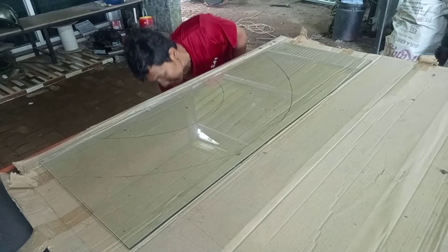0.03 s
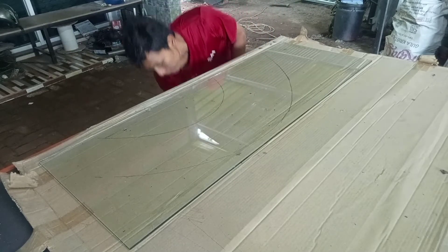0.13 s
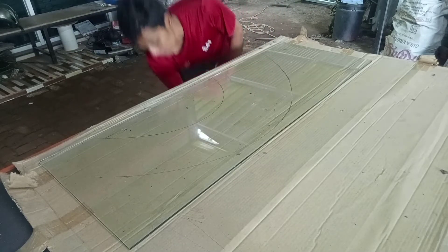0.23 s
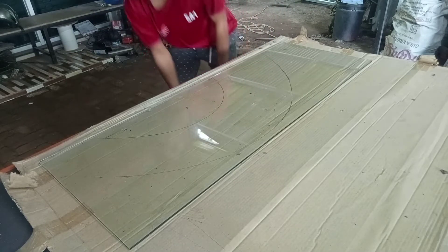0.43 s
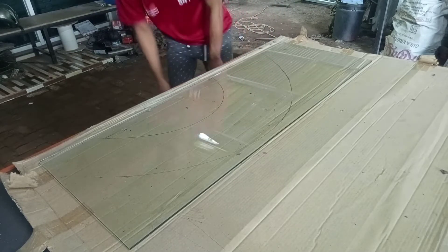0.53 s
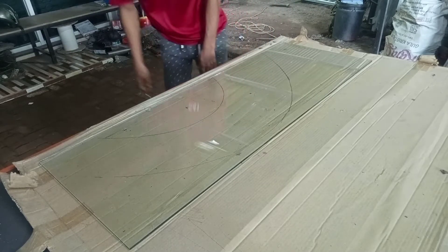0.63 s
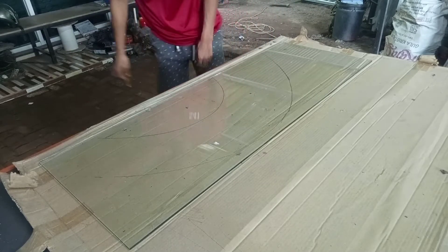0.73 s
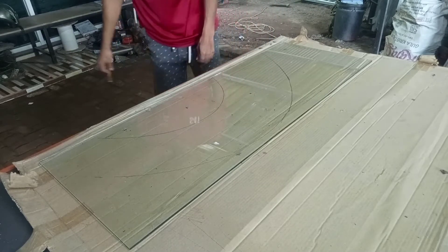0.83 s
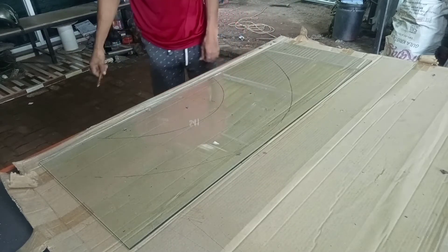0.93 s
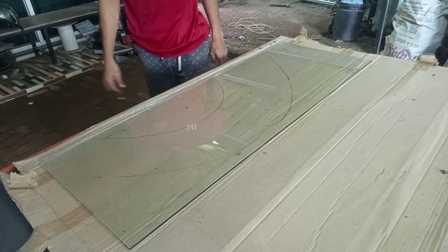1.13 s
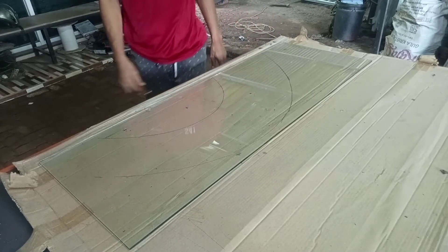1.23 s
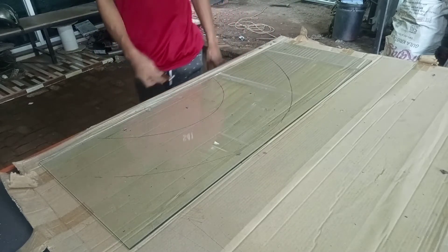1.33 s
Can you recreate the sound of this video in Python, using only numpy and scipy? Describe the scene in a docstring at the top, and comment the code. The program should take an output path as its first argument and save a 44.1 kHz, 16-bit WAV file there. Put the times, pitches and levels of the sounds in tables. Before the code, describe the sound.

One sharp knock rings on a glass sheet, then shoes and clothes shuffle quietly.

```python
"""In a workshop, where a glass sheet lies on a table, a sharp knock rings out: the contact cracks,
the struck object rings in its normal modes, and the room answers with dense reverberation.
The ring of an earlier clink is still fading at the start. Soles and clothes shuffle by friction
as someone stands up. A distant engine hums and picks up speed, its harmonics rising together,
over soft low bumps, a machine's hum and a steady rumble and hiss."""
import sys
import numpy as np
from scipy import signal
from scipy.fft import rfft, irfft, next_fast_len
from scipy.io import wavfile
from scipy.ndimage import map_coordinates

SR = 44100
rng = np.random.default_rng(int(sys.argv[2]) if len(sys.argv) > 2 else 0)


def file_out(sig):
    """Save sig as 16-bit WAV at sys.argv[1]."""
    # one column per channel
    cols = np.atleast_2d(sig).T
    # limit, then scale
    lim = np.clip(cols, -1, 1)
    pcm = np.round(lim * 32767).astype(np.int16)
    wavfile.write(sys.argv[1], SR, pcm)


N = 61739
KNOCK_S = .1324


def amp(db):
    """Amplitude ratio of a level in decibels."""
    return 10 ** (np.asarray(db) / 20)


def unit(x):
    """Normalisation to rms 1."""
    return x / np.sqrt(np.mean(np.abs(x) ** 2) + 1e-20)


def clock():
    """Sample times in seconds."""
    return np.arange(N) / SR


def along(points, hz):
    """Interpolation of (f/Hz, value) points on a logarithmic frequency axis."""
    f, values = np.transpose(points)
    return np.interp(np.log(hz + 1), np.log(f + 1), values)


def wobble(rate):
    """Smooth random modulation: a spline through `rate` Gaussian knots a second."""
    return map_coordinates(rng.standard_normal(4096), [clock() * rate + 2], mode="wrap")


def filtered(x, response):
    """Linear filtering: the spectrum of x times a frequency response."""
    size = next_fast_len(N + 8192)
    return irfft(rfft(x, size) * response(np.fft.rfftfreq(size, 1 / SR)), size)[..., :N]


def noise(spectrum):
    """White noise filtered to a spectral shape, at rms 1."""
    return unit(filtered(rng.standard_normal(N), lambda hz: amp(along(spectrum, hz))))


def narrowband(hz, width_hz):
    """Random modulation broadens a spectral line into a band of rms 1."""
    modulation = wobble(width_hz) + 1j * wobble(width_hz)
    return unit(np.real(modulation * np.exp(2j * np.pi * hz * clock())))


def decay_time(age, hold_s=.15, hold_slope=.64):
    """Two-slope decay: the time counted towards T60 runs slowly at first, then at full rate."""
    return age - (1 - hold_slope) * np.minimum(age, hold_s)


def background():
    """Stationary broadband rumble and hiss, with the line spectrum of a humming machine."""
    # Hum partials: f/Hz, level/dB
    partials = [(152, -60), (229, -65)]
    # Rumble and hiss: f/Hz, relative spectral level/dB
    air = [(15, -49), (25, -25), (45, -4.5), (140, -7), (252, -15), (388, -13.5), (420, -14.5), (481, -13),
           (646, -20.5), (1110, -22), (1260, -24.5), (1530, -18.5), (1700, -27), (3330, -23), (5550, -49),
           (7660, -22.5), (8300, -36), (11800, -50.5), (15400, -42)]
    hum = sum(amp(db + .97 * wobble(5.2)) * np.sin(2 * np.pi * hz * clock()) for hz, db in partials)
    return amp(-50) * noise(air) + np.sqrt(2) * hum


def bumps(width_s=.023):
    """Dull bumps: Gaussian pulses modulate the amplitude of low-frequency noise."""
    # Pulse peaks: t/s, level/dB
    peaks = [(.07, -50.5), (.545, -46), (.83, -48), (1.095, -50), (1.205, -46)]
    # Bump spectrum: f/Hz, relative spectral level/dB
    spectrum = [(50, -23), (90, -4.5), (150, 1), (210, -5), (320, -20), (1000, -62)]
    return noise(spectrum) * sum(amp(db) * np.exp(-((clock() - s) / width_s) ** 2) for s, db in peaks)


def engine():
    """A periodic source radiates harmonics of its cycle rate; they rise as the engine speeds up."""
    # Cycle rate: t/s, f/Hz
    cycle_rate = [(0, 24.4), (.3, 24.37), (.7, 24.55), (.9, 25.93), (1.03, 28.3), (1.15, 31.74),
                  (1.4, 32.3)]
    # Envelope common to all orders: t/s, level/dB
    envelope = [(0, -44), (.1, -43), (.15, -50.5), (.45, -50), (.68, -48), (.78, -42), (.9, -43),
                (1.05, -47), (1.25, -50), (1.4, -57.5)]
    # Engine orders: multiple of the cycle rate, relative level/dB
    orders = [(2, -3), (3, -7.5), (4, -16), (5, -14.5), (6, -16), (8, -18)]
    t = clock()
    phase = 2 * np.pi * np.cumsum(np.interp(t, *np.transpose(cycle_rate))) / SR
    tone = sum(amp(db + 3.1 * wobble(14.68)) * np.sin(k * phase + rng.uniform(0, 2 * np.pi))
               for k, db in orders)
    return np.sqrt(2) * amp(np.interp(t, *np.transpose(envelope))) * tone


def shuffles(grit_db=1.6, scrape_s=1.258, scrape_rise_s=.01):
    """Friction of soles and clothes: noise swells that add in power, ending in a faintly singing scrape."""
    # Swells: peak t/s, rise/s, fall/s, scuff level/dB, thud level/dB, swish level/dB
    swells = [(.56, 0.077, 0.057, -52.5, -58, -70), (0.661, 0.048, 0.031, -47, -54, -66),
              (0.733, 0.034, 0.069, -48, -43.5, -59), (.925, 0.022, 0.043, -57, -62, -67),
              (1.2, 0.12, 0.11, -63.5, -51.5, -82), (1.345, .07, 0.24, -46.5, -50.5, -53.5)]
    # Midrange scuff, dull thud and treble swish: f/Hz, relative spectral level/dB
    scuff_spectrum = [(300, -5), (700, -4), (1060, -1), (1400, -5), (1900, 1), (2450, 1), (3000, -2.5),
                      (3900, -7), (4900, -24), (6200, -20), (7300, -9.5), (8500, -24), (12000, -28),
                      (15000, -24)]
    thud_spectrum = [(60, -13), (160, -3), (290, -10.5), (385, -1), (480, 2), (620, -11), (1000, -8.5),
                     (2000, -28.5), (6000, -58)]
    swish_spectrum = [(1000, -28), (3900, 1), (5200, -7.5), (7300, 3.5), (8500, -8.5), (12000, -12.5),
                      (15200, -5.5)]
    # Scrape bands: f/Hz, width/Hz, level/dB
    bands = [(398.2, 16, -55), (1065, 36, -57), (2440, 82, -51), (3890, 60, -60)]
    t, power = clock(), np.zeros((3, N))
    for s, rise, fall, scuff_db, thud_db, swish_db in swells:
        swell = np.exp(-((t - s) / np.where(t < s, rise, fall)) ** 2)
        power += swell * amp([[scuff_db], [thud_db], [swish_db]]) ** 2
    scuff, thud, swish = np.sqrt(power)
    onset = np.clip((t - scrape_s) / scrape_rise_s, 0, 1)
    scrape = onset * sum(amp(db) * narrowband(hz, width) for hz, width, db in bands)
    rubbing = scuff * noise(scuff_spectrum) + swish * noise(swish_spectrum)
    grit = amp(grit_db * wobble(220))
    return rubbing * grit + thud * noise(thud_spectrum) + scrape


def earlier_ring(t60_s=.4, in_phase_s=.02, roughness=.68):
    """Free decay of an earlier clink: close modes beat within fading reverberation."""
    # Clink modes: f/Hz, relative level/dB
    modes = [(800, -60), (1177, -57), (1844, -57), (2893, -45), (2910, -48), (3478, -56), (3924, -60),
             (6465, -63), (7650, -62), (8096, -64), (10358, -71)]
    # Reverberation: f/Hz, relative spectral level/dB
    tail = [(200, -20), (800, -3.5), (2500, -1.5), (3700, -0.5), (5200, -11), (7300, -2.5), (9000, -13),
            (12000, -18.5), (15300, -17)]
    t = clock()
    ringing = sum(amp(db) * (np.sin(2 * np.pi * hz * (t - in_phase_s)) + roughness * narrowband(hz, 72))
                  for hz, db in modes)
    return amp(-60 * t / t60_s) * (amp(2) * ringing + amp(-43) * noise(tail))


def modal_noise(spectrum, ripple_db=1.5, spacing_hz=34.93):
    """Modal overlap: many weak resonances ripple the spectrum of a noise of rms 1."""
    knots = rng.standard_normal(8192)
    ripple = lambda hz: amp(ripple_db * map_coordinates(knots, [hz / spacing_hz], mode="wrap"))
    return unit(filtered(noise(spectrum), ripple))


def reverberation(age, wall_delay_s=.0145, bloom_s=.001, echo_width_s=.01, flutter_db=1.2):
    """The diffuse field builds after the first wall reflection; each band decays at its own rate."""
    # Initial tail spectrum: f/Hz, relative spectral level/dB
    spectrum = [(150, -51), (260, -24), (330, -15.5), (480, -15.5), (640, -13.5), (760, -2.5), (1000, -.5),
                (1450, -5), (2000, -1), (2450, -4.5), (3000, -2), (3900, -4), (4400, -14), (4900, -23),
                (5400, -19), (6400, -13), (6900, -5), (7600, -8), (8600, -19.5), (10200, -18),
                (11600, -25.5), (13000, -20.5), (15300, -20)]
    # Reverberation time of the late slope: f/Hz, T60/s
    t60 = [(300, 0.62), (900, .51), (2300, 0.6), (4000, 0.54), (7000, 0.5), (14000, 0.43)]
    # Groups of wall echoes that lift the tail: t/s after the knock, gain/dB
    echoes = [(.018, 2), (.06, 0.6), (.09, 1.8)]
    hz, t, bands = signal.stft(modal_noise(spectrum), SR, nperseg=256)
    tail_age = np.maximum(t - KNOCK_S - wall_delay_s, 0)
    fade = amp(-60 * decay_time(tail_age) / along(t60, hz)[:, None])
    onset = 1 - np.exp(-np.maximum(age - wall_delay_s, 0) / bloom_s)
    tail = signal.istft(bands * fade, SR)[1][:N] * onset
    echoes_db = sum(db * np.exp(-((age - s) / echo_width_s) ** 2) for s, db in echoes)
    return amp(-17.5 + echoes_db + flutter_db * wobble(249.8)) * tail


def crack(age, t60_s=.2):
    """A brief contact excites a broad band of frequencies that decays exponentially."""
    # Contact noise: f/Hz, relative spectral level/dB
    spectrum = [(150, -55), (280, -24), (420, -10), (620, -8), (900, 3), (1800, 2), (2500, -7), (3300, 2.5),
                (4100, -8), (5200, -21), (7000, -7.5), (9000, -19), (12000, -22), (15300, -17)]
    return (age > 0) * amp(-21.5 - 60 * age / t60_s) * noise(spectrum)


def ring(age, rise_s=.011, roughness=.38, blur_hz=42):
    """Damped normal modes of the struck object, each line broadened a little by the room."""
    # Main modes: f/Hz, relative level/dB, T60/s of the late slope
    modes = [(738, -34, .62), (1032, -35, .5), (1740, -33, .55), (1922, -35, .55), (1973, -32, .55),
             (2078, -28, .62), (2226, -35, .6), (2909, -25, .6), (2935, -32, .6), (3205, -34, .5),
             (3489, -27, .56), (3790, -25, .5), (3877, -30, .45), (4170, -26.5, .52), (4663, -39, .66),
             (6142, -42, .45), (6675, -33, .34), (7057, -19.5, .34), (7538, -27, .4), (7662, -35, .45),
             (8030, -37, .36), (10358, -37.5, .43), (12312, -47, .36), (13060, -43, .35), (13701, -41, .35),
             (14551, -36, .34)]
    ringing = np.zeros(N)
    for hz, db, t60 in modes:
        tone = np.sin(2 * np.pi * hz * age + rng.uniform(0, 2 * np.pi))
        envelope = amp(db - 60 * decay_time(age) / t60)
        ringing += envelope * (tone + roughness * narrowband(hz, blur_hz))
    return amp(.8) * ringing * (1 - np.exp(-age / rise_s))


def knock():
    """Impulse excitation: one impact sets off the crack, the reverberation and the ring."""
    age = np.maximum(clock() - KNOCK_S, 0)
    return crack(age) + reverberation(age) + ring(age)


def scene():
    """Superposition of all sources at one point."""
    return (knock() + earlier_ring() + engine() + shuffles() + bumps() + background())[None]


def record(dry):
    """Band limiting by a steep low-pass filter."""
    cutoff_hz = 15480
    return filtered(dry, lambda hz: 1 / np.sqrt(1 + np.minimum(hz / cutoff_hz, 2) ** 400))


dry = scene()
out = record(dry)
file_out(out)
```